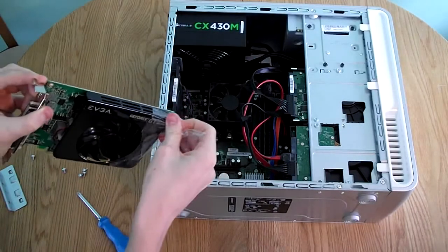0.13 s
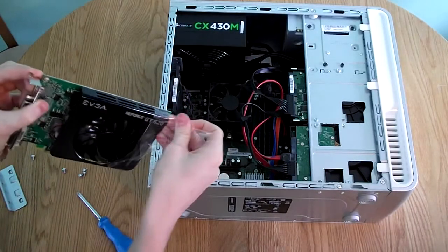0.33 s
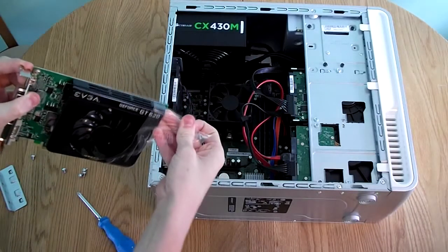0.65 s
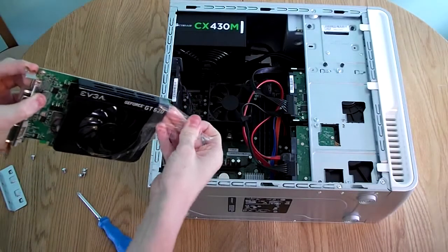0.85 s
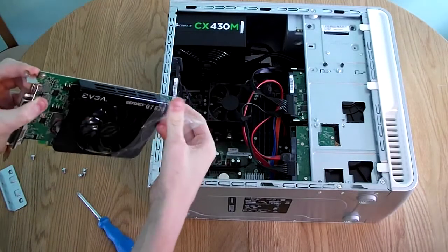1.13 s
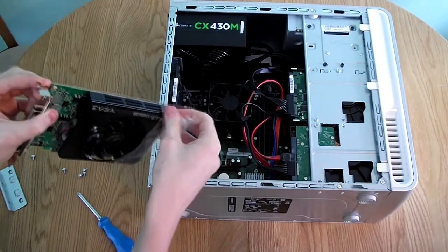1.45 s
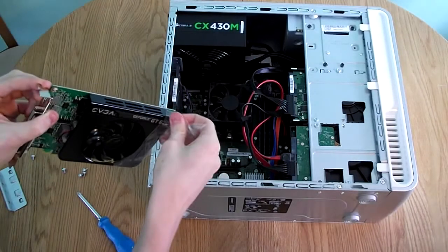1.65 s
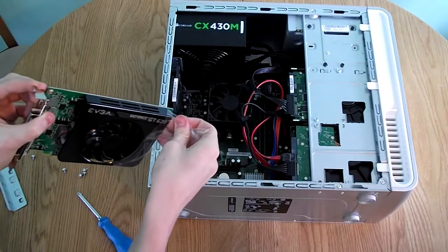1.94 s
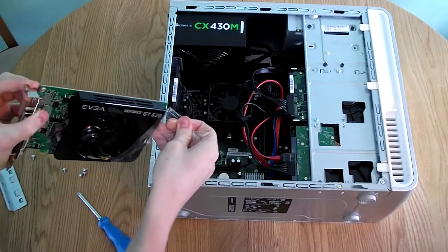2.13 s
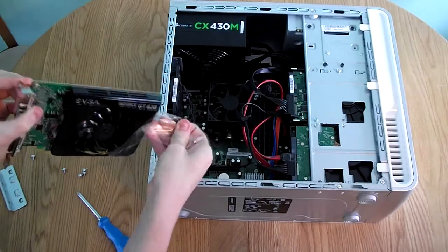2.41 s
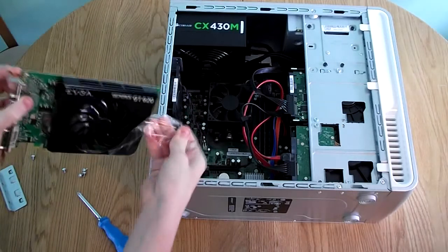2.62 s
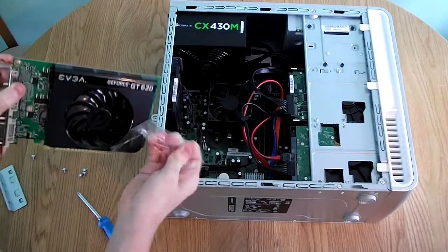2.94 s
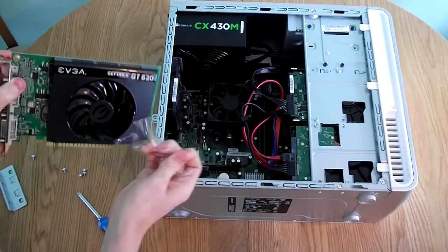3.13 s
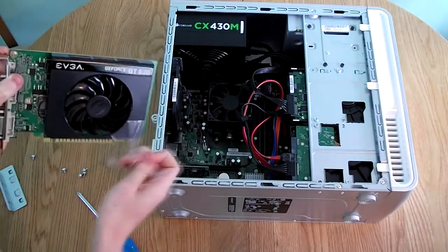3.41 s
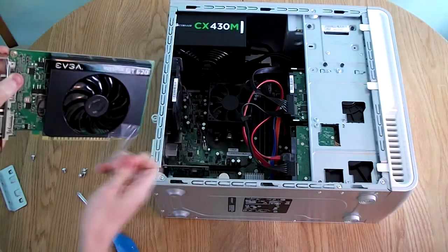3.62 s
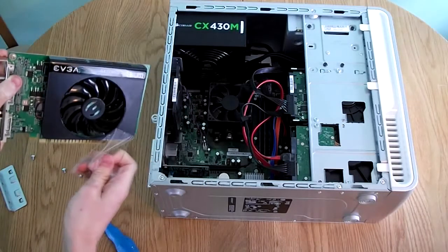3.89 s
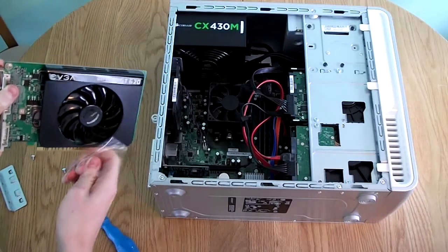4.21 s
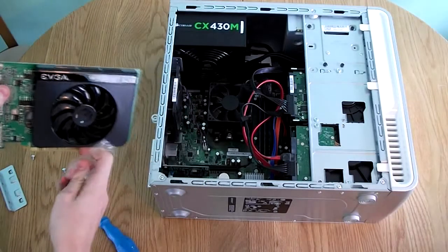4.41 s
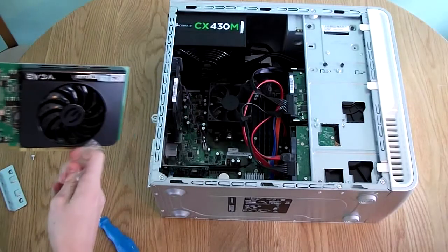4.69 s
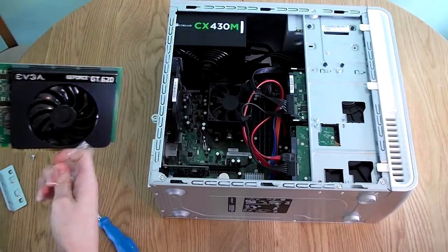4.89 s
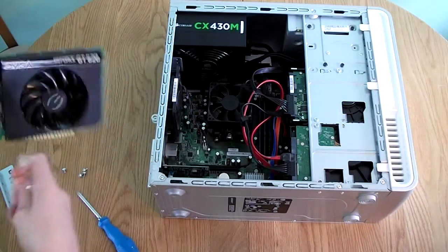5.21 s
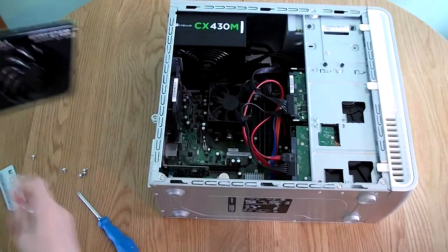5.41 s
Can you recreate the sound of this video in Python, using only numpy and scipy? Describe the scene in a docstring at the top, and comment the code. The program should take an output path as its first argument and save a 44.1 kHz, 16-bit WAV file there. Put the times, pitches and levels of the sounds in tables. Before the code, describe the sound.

Irregular, bright plastic crackling indoors, heard very close with a short room echo. An early flurry of sharp snaps is followed by sparse ticks, then a tight, louder cluster that makes the microphone level dip and recover. Bursts of crinkle and short rips follow, then gentler isolated crackles, a faint metal ring and a last crisp crease, over soft room tone and a low wavering hum.

```python
"""Protective film is peeled by hand off a graphics card above a table in a small room.
A first hard pull fires a burst of snaps and rips (resonated kicks, tick trains); the card's metal modes ping.
The loudest snaps come near 1.6 s, dense crinkling (banded ticks) follows to about 3 s, then sparser creases.
A low drone of drifting pitch and wavering loudness (a sine), still air (noise) and faint hum run throughout.
A close camera turns its gain down after the loudest snaps and lets it creep back."""
import sys
import numpy as np
from scipy import signal
from scipy.fft import rfft, irfft
from scipy.io import wavfile
from scipy.ndimage import uniform_filter1d, minimum_filter1d

SR = 44100
rng = np.random.default_rng(int(sys.argv[2]) if len(sys.argv) > 2 else 0)


def generate_wav(sig):
    """Save sig (samples, or channels by samples) to the path in sys.argv[1] as 16-bit PCM at SR."""
    pcm = np.round(np.clip(np.atleast_2d(sig).T, -1, 1) * 32767).astype(np.int16)
    wavfile.write(sys.argv[1], SR, pcm)


N = 244755
TIME = np.arange(N) / SR


def undb(db):
    """Amplitude factor of a level in dB."""
    return 10 ** (np.asarray(db) / 20)


def unit(x):
    """Scale to rms 1."""
    return x / np.sqrt(np.mean(x ** 2) + 1e-18)


def curves(table):
    """Columns of a table of (s, ..) rows, interpolated sample by sample."""
    s, *columns = np.transpose(table)
    return [np.interp(TIME, s, c) for c in columns]


def gain_at(hz, points):
    """Amplitude gain of a (Hz, dB) spectrum, interpolated over log frequency."""
    point_hz, db = np.transpose(points)
    return undb(np.interp(np.log(hz + 1e-9), np.log(point_hz), db))


def colour(x, points):
    """Filter a sound by a (Hz, dB) spectrum."""
    hz = np.fft.rfftfreq(x.shape[-1], 1 / SR)
    return irfft(rfft(x) * gain_at(hz, points), x.shape[-1])


def resonate(x, hz, width):
    """Damped resonance applied twice; width of each pass is a share of the pitch."""
    w = 2 * np.pi * min(hz / SR, .45)
    a = np.sin(w) * abs(width) / 2
    section = np.array([a, 0, -a, 1 + a, -2 * np.cos(w), 1 - a]) / (1 + a)
    return signal.sosfilt([section] * 2, x + 1e-18)


def add(track, start_s, x):
    """Mix x into the track from start_s."""
    i = int(np.clip(start_s * SR, 0, N - 1))
    track[i:i + len(x)] += x[:N - i]


def slips(per_s, scatter_db):
    """Random ticks of either sign and scattered size, per_s of them a second."""
    hit = rng.random(N) < per_s / SR
    size = np.minimum(rng.standard_normal(N), 1.6)  # caps the largest
    sign = rng.choice([-1, 1], N)
    return hit * undb(scatter_db * size) * sign


def snaps(creases, flutter_s=0.0019, flutter_db=-1, crack_db=-27, edge_db=-11,
          table_db=-12, beam_db_per_db=0.32, beam_from_db=-14):
    """A crease kicks a facet for a cycle or two, then bending waves flutter; returns (to camera, to room)."""
    direct, sent, t = np.zeros(N), np.zeros(N), TIME[:SR // 50]
    kick = 1. * (t == 0)
    for start_s, level_db, hz, width, sheet_db in creases:
        waves = rng.standard_normal(len(t)) * np.exp(-t / flutter_s) * (t > .0004)
        crack = undb(crack_db) * unit(resonate(kick, 1770, 1.5))
        facet = unit(resonate(kick, hz, width)) + crack
        # a neighbouring facet rings along at its own pitch
        edge_hz = hz * 2 ** rng.uniform(-0.563, 0.45)
        edge = unit(resonate(waves, edge_hz, 0.067))
        sheet = unit(resonate(waves, hz, width + 0.34))
        snap = facet + undb(edge_db + sheet_db / 2) * edge + undb(sheet_db + flutter_db) * sheet
        # the table top throws it back, later or sooner as the hand moves
        table_delay_s = rng.uniform(0.00083, 0.0018)
        snap = snap + undb(table_db) * np.roll(snap, int(table_delay_s * SR))
        # levels count over 1 ms, rms was set over 20 ms
        snap = undb(level_db) * snap / np.sqrt(20)
        add(direct, start_s, snap)
        # the loudest facets face the camera, so the room gets less of them
        beam_loss_db = beam_db_per_db * max(level_db - beam_from_db, 0)
        add(sent, start_s, snap * undb(-beam_loss_db))
    return direct, sent


def small_creases(swell, crinkle_db, bright, scatter_db=4.5, width=0.86, sheet_db=-9,
                  spread_octaves=0.26, octaves_per_bright=-0.01):
    """Random creases, more frequent in a swell and louder with the crinkling; rows as snaps() takes them."""
    swell_per_s, slack_per_s = 40, 9.2
    # in gentle crinkling: crease level over 1 ms, pitch, level of the crinkling
    gentle_crease_db, gentle_hz, gentle_crinkle_db = -32.5, 5610, -40.5
    growth_db_per_db = 0.6
    rows, count = [], 1000
    per_s = slack_per_s + swell * (swell_per_s - slack_per_s)
    for place, chance, loud, high, broad in rng.random((count, 5)):
        i = int(place * N)
        if chance < per_s[i] * N / SR / count:
            growth_db = growth_db_per_db * (crinkle_db[i] - gentle_crinkle_db)
            level_db = gentle_crease_db + growth_db + scatter_db * (2 * loud - 1)
            octaves = octaves_per_bright * bright[i] + spread_octaves * (2 * high - 1)
            rows.append((i / SR, level_db, gentle_hz * 2 ** octaves, width * (.5 + broad), sheet_db))
    return rows


def crinkle_swells(attack_s=.012, release_s=0.032, slack_bright_db_per_octave=7.5):
    """Crinkling swells over a slack rustle; returns swell (0-1), level dB, brightness dB per octave."""
    # swells of crinkling: pulls of the hand, and the echo tail after the loud snaps near 1.6 s
    # start_s, length_s, level_db, brightness_db_per_octave
    swells = [(0.005, 0.0096, -35.5, 2.5), (0.137, 0.054, -47, 2), (0.23, 0.16, -24.5, 3.5),
              (0.72, 0.025, -47.5, 1.5), (0.91, 0.095, -46, -3.5), (1.031, 0.061, -35, 1),
              (1.479, 0.013, -39, -5.5), (1.626, .03, -40.5, -6.5), (1.827, .11, -39.5, 3),
              (2.021, 0.16, -32, 2), (2.22, 0.075, -41, -4.5), (2.318, 0.077, -30.5, -5.5),
              (2.424, 0.13, -43.5, -2.5), (2.593, .15, -36, 4.5), (2.879, .03, -43.5, 11.5),
              (2.96, 0.16, -32.5, 1), (3.195, 0.037, -39, -4), (3.346, 0.198, -39, 2.5),
              (3.569, .22, -45.5, 5), (3.8, .25, -56, 13), (4.185, .04, -39.5, -2.5),
              (4.29, .17, -42, -1.5), (4.5, 0.15, -43.5, 0.5), (4.823, 0.1, -43.5, 2),
              (5.08, 0.19, -43.5, -1), (5.389, 0.064, -34, 1.5), (5.529, .02, -27.5, 5)]
    # rustle of the film held slack between swells: time_s, level_db
    slack = [(0, -55), (1.4, -56), (2.9, -50.5), (5.55, -52)]
    power = undb(curves(slack)[0]) ** 2
    swell, bright = np.zeros(N), power * slack_bright_db_per_octave
    for start_s, length_s, level_db, bright_db in swells:
        rise = np.minimum(TIME - start_s, 0) / attack_s
        fall = np.maximum(TIME - start_s - length_s, 0) / release_s
        envelope = np.exp(rise - fall)
        share = (undb(level_db) * envelope) ** 2
        swell = np.maximum(swell, envelope)
        power = power + share
        bright = bright + share * bright_db
    return swell, 10 * np.log10(power), bright / power  # power-weighted brightness


def crinkle(level_db, bright, per_s=750, scatter_db=1.0, patchy_db=2.5):
    """Countless small creases: ticks with a short flutter, through bands of randomly varied tick size."""
    # colour of the crinkling: frequency_hz, density_db_per_hz
    film = [(400, -53), (900, -15), (1800, -10.5), (3000, -2), (4200, -4), (6200, -2), (9000, -18),
            (12500, -11.5), (16000, -26)]
    ticks, out = slips(per_s, scatter_db), 0
    flutter = rng.standard_normal(256) * np.exp(-TIME[:256] / .0009)
    ticks = ticks + 0.33 * signal.fftconvolve(ticks * rng.standard_normal(N), flutter)[:N]
    for k, hz in enumerate(np.geomspace(600, 14000, 9)):
        patchy = undb(patchy_db * rng.standard_normal(N))
        band = unit(resonate(ticks * patchy, hz, 0.82))
        weight = gain_at(hz, film) * np.sqrt(hz / 12000)  # density to band level
        tilt = undb(bright * np.clip(np.log2(hz / 5000), -1, 2))
        out = out + (-1) ** k * band * weight * tilt
    return out * undb(level_db)


def rips(per_s=3500, scatter_db=4):
    """The peel front races along: tiny slips of the glue swell to a climax and die away."""
    # rips: climax_s, swell_s, fade_s, level_db, pitch_hz, width_per_pitch
    runs = [(.25, 0.023, 0.088, -36.5, 930, 2.5), (.285, 0.0029, 0.013, -15.5, 4860, 1.2),
            (1.075, 0.018, 0.013, -35, 5370, 0.88), (2.057, 0.0031, 0.017, -23.5, 5630, 1.45),
            (2.744, 0.018, 0.022, -30, 5200, 1.3), (2.857, 0.0016, 0.0018, -15.5, 5160, 1.13),
            (2.975, 0.012, 0.046, -32, 6640, 3.35), (3.062, 0.0048, 0.0059, -17, 4000, 0.31),
            (3.074, 0.013, 0.013, -19, 5650, 2.5), (3.085, 0.012, 0.016, -40, 990, 0.9),
            (3.67, 0.06, 0.021, -40, 12200, 2.5), (3.865, 0.0097, 0.0047, -34, 6270, 0.19),
            (5.148, 0.011, 0.0028, -19, 5160, 0.85), (5.158, 0.0026, 0.00294, -15, 5570, 1.2),
            (5.152, 0.012, 0.0092, -27, 12400, 0.66)]
    out, ticks = np.zeros(N), slips(per_s, scatter_db)
    for climax_s, swell_s, fade_s, level_db, hz, width in runs:
        near = abs(TIME - climax_s) < .1
        t = TIME[near] - climax_s
        envelope = np.exp(-abs(t / np.where(t < 0, swell_s, fade_s)))
        out[near] += undb(level_db) * unit(resonate(ticks[near], hz, width)) * envelope
    return out


def card(knock_s=0.0045, focus_db_per_octave=30, buzz=0.37, thud_db=-14, thud_s=0.00044):
    """The card jolts as the film gives: a hand-damped knock, and modes picked by the place of the jolt."""
    # jolts: start_s, knock_db, ring_db, best_mode_hz
    jolts = [(0.211, -20, -27, 2500), (1.586, -27, -60, 1500), (2.145, -21.5, -44, 1800),
             (2.306, -30, -36, 1140), (3.078, -32, -32.5, 2500), (4.065, -34, -40, 1632),
             (4.829, -68, -45.5, 2500), (4.937, -70, -47, 2550), (5.157, -47, -25.5, 2540),
             (5.254, -65, -46, 2470), (5.385, -61, -41, 2500)]
    # modes of card and bracket: pitch_hz, level_db, t60_s
    metal = [(900, -5, .2), (1150, -1, .2), (1550, -2, .22), (1660, -5, .13), (1810, -7, .2),
             (2400, -15, .1), (2503, 1, .16), (2545, -11, .08), (4247, -4, .25)]
    # colour of the knock: frequency_hz, density_db_per_hz
    board = [(40, 38), (150, -30), (400, -1), (700, -29.5), (1100, 26.5), (2000, 29), (4000, -50)]
    out, t = np.zeros(N), TIME[:SR // 2]
    for start_s, knock_db, ring_db, best_hz in jolts:
        knock = unit(colour(rng.standard_normal(len(t)), board)) * np.exp(-t / knock_s)
        # the shove of the released film adds one soft thud
        knock = knock + undb(thud_db) * t / thud_s * np.exp(1 - t / thud_s)
        ring = 0
        for hz, mode_db, t60_s in metal:
            # the loosely held bracket shivers as it rings
            shiver = 1 + buzz * unit(resonate(rng.standard_normal(len(t)), 61, 1))
            tone = shiver * np.sin(2 * np.pi * hz * t) * np.exp(-np.log(1000) * t / t60_s)
            off_db = focus_db_per_octave * abs(np.log2(hz / best_hz))
            ring = ring + undb(mode_db - off_db) * tone
        add(out, start_s, undb(knock_db) * knock + undb(ring_db) * ring)
    return out


def low_drone(waver=0.27):
    """A low sine of drifting pitch and level, its amplitude wavering at random."""
    # drone: time_s, pitch_hz, level_db
    drone = [(0, 62.1, -49.5), (2.9, 60.2, -68), (3.15, 51.05, -50), (3.35, 54.2, -62), (3.55, 56.3, -48),
             (3.95, 54.15, -45.5), (4.3, 57.3, -50), (4.7, 52.6, -49.5), (5.1, 55.9, -56),
             (5.55, 53, -49.5)]
    hz, level_db = curves(drone)
    wobble = unit(resonate(rng.standard_normal(N), 6.3, 2.5))
    tone = np.sin(2 * np.pi * np.cumsum(hz) / SR)
    return undb(level_db) * unit(tone * (1 + waver * wobble))


def room(x, early_db=-11, early_s=0.0099, late_db=-12, t60_s=0.45):
    """Table and open case scatter the sound at once; the walls follow with a short noise tail."""
    # colour of the echo: frequency_hz, gain_db
    walls = [(100, -9), (1000, 9), (4000, 1.5), (8000, -3), (16000, 5)]
    t = TIME[:SR * 3 // 4]
    early = rng.standard_normal(len(t)) ** 3 * np.exp(-t / early_s) * (t > .0015)  # cubed: sparse
    late = rng.standard_normal(len(t)) * np.exp(-np.log(1000) * t / t60_s) * np.minimum(t / 0.0021, 1)
    echo = (undb(early_db) * unit(early) + undb(late_db) * unit(late)) / np.sqrt(len(t))
    return signal.fftconvolve(x, colour(echo, walls))[:N]


def background(air_db=-48.5):
    """Still air as coloured noise, household hum as faint steady sines."""
    # colour of the air: frequency_hz, density_db_per_hz
    air = [(20, -13), (36, 3), (62, -1), (85, -7), (140, -10), (300, -14), (560, -16), (1000, -23),
           (2500, -17), (4500, -19.5), (6500, -22.5), (9000, -33), (15000, -32)]
    # hum: pitch_hz, level_db
    hum_tones = [(226, -67.5), (538.5, -63), (587, -72), (980, -75), (1739, -71.5), (3278, -64),
                 (4457, -63.5), (4748, -68), (5728, -68.5), (6072, -71)]
    hum = sum(undb(db) * unit(np.sin(2 * np.pi * (hz * TIME + rng.random()))) for hz, db in hum_tones)
    return undb(air_db) * unit(colour(rng.standard_normal(N), air)) + hum


def scene(side_db=-2.5, card_room_db=-7):
    """Two close ports: the right hears the sound a sample sooner, and the treble of the echo differs."""
    # big creases: start_s, level_db (over 1 ms), pitch_hz, width_per_pitch, sheet_flutter_db
    big_creases = [(0.0398, -19.5, 5600, 0.55, -5.5), (0.092, -23.5, 4700, 1.6, -1),
                   (0.212, -2, 4880, 0.64, 1.5), (0.2223, -12, 4200, 0.91, 5), (0.2399, -9, 4530, 0.3, -15),
                   (0.2487, -8.5, 4870, 0.39, -17), (0.2567, -9.5, 5130, 0.53, -19.5),
                   (0.2699, -13, 5350, 0.5, -15), (0.282, -5.5, 5750, 0.41, -20),
                   (0.3024, -11, 6000, 0.81, -2), (0.3212, -9, 5600, 0.51, -14),
                   (0.337, -8, 6100, 0.4, -21), (0.3483, -1.5, 4950, 1.5, -28),
                   (0.3725, -4, 4940, 0.91, -1.5), (0.379, -4, 6050, 0.33, -22),
                   (0.4074, -14.5, 6240, 0.35, -12), (0.4399, -18, 6540, 0.51, -7),
                   (0.4938, -9, 6640, 1.9, -10), (0.5838, -20, 6840, 0.47, -13.5),
                   (0.604, -20.5, 6500, 0.92, -18), (0.7208, -31, 3170, 2, -4),
                   (0.8404, -21.5, 5700, 2.5, -4), (1.0456, -26, 5100, 1.2, -1),
                   (1.0673, -21, 5530, 0.31, -22), (1.083, -22, 5280, 1.05, 2.5),
                   (1.1553, -31, 6140, 0.68, -14), (1.1728, -24, 6140, 0.51, 2),
                   (1.5015, -23, 6270, 0.28, -4), (1.5314, -28.5, 5400, 1, -4), (1.586, 0, 5800, 0.5, -18),
                   (1.5904, 1.5, 5700, 0.73, -15), (1.598, -3.5, 5660, 0.43, -15),
                   (1.6121, -2, 5450, 0.48, -19), (1.6172, -2, 5950, 0.35, -7.5),
                   (1.621, -11, 5670, 0.45, -14), (1.7898, -18, 6000, 0.68, -26),
                   (1.8293, -17.5, 6040, 0.62, -13), (1.87, -14.5, 4700, 2, -25),
                   (2.0115, -15, 4670, 1.07, -4), (2.0213, -15.5, 6600, 0.53, -17),
                   (2.0301, -12.5, 6170, 0.67, -21.5), (2.0559, -12.5, 5540, 1.55, -4),
                   (2.075, -14, 6240, 1.5, -12), (2.1072, -16, 5050, 2.4, -6),
                   (2.1456, -6, 4770, 1.28, -11), (2.181, -19, 4700, 2.2, -0.5),
                   (2.3065, -5, 6040, 1.35, -11), (2.3115, -11, 5440, 1.5, -21),
                   (2.316, -10.5, 3600, 1.6, -19), (2.3254, -13.5, 3820, 1.06, -2),
                   (2.337, -12.5, 4120, 0.85, -25), (2.3578, -14, 4230, 0.8, -15),
                   (2.7, -22, 7300, 0.33, -16), (2.819, -25.5, 4170, 0.87, -10),
                   (2.8443, -11, 5610, 1.13, -15), (2.858, -11.5, 3720, 0.49, -23),
                   (2.9591, -18.5, 5130, 0.95, 0), (2.9816, -18.5, 4340, 0.81, -13),
                   (3.021, -18.5, 4000, 0.88, -3), (3.072, -11, 4700, 0.45, 0),
                   (3.1977, -16.5, 5840, 1.8, -3), (3.368, -30, 5720, 0.57, 3.5),
                   (3.6274, -25, 7240, 3.9, 1), (3.8834, -25.5, 8980, 1.4, -11),
                   (3.9296, -27, 11300, 2.4, -3), (3.999, -28.5, 12000, 1.2, -13),
                   (4.067, -22, 4530, 1.6, 2), (4.1497, -20, 11700, 1.75, -10),
                   (4.1782, -28.5, 5155, 1.61, -4), (4.2022, -31.5, 6900, 2.3, -1),
                   (4.2268, -25, 5670, 1.2, -1), (4.3201, -32, 5240, 0.53, -17),
                   (4.4434, -23.5, 4100, 0.8, -26.5), (4.5364, -23, 5740, 0.64, 2),
                   (4.5946, -22.5, 5400, 1.06, -3), (4.7495, -11.5, 7740, 1.34, -0.5),
                   (4.8282, -28, 5630, 0.84, -5.5), (5.1214, -18.5, 5040, 0.72, -14),
                   (5.1465, -12.5, 5194, 0.78, -2.5), (5.1566, -14, 5500, 0.75, -26),
                   (5.3831, -29, 3880, 1.3, 1), (5.5431, -16.5, 7100, 0.59, -19)]
    # how far the channels part: frequency_hz, side_gain_db
    spread = [(1200, -7), (2000, -34), (3000, -3.5), (7000, -0.5), (15000, -1)]
    swell, crinkle_db, bright = crinkle_swells()
    rustle, jolts = crinkle(crinkle_db, bright) + rips(), card()
    steady = low_drone() + background()
    direct, sent = snaps(big_creases + small_creases(swell, crinkle_db, bright))
    into_room = sent + rustle + undb(card_room_db) * jolts
    sound = direct + rustle + jolts + room(into_room) + steady
    late = np.append(0, sound[:-1])
    treble = signal.butter(2, 4500, "high", fs=SR, output="sos")
    diffuse = signal.sosfilt(treble, room(into_room))  # a second, independent echo
    mid = (late + sound) / 2
    side = colour((late - sound) / 2 + undb(side_db) * diffuse, spread)
    return np.array([mid + side, mid - side])


def record(dry, limit_db=-8.5, recover_db_per_s=36, top_hz=16000):
    """Gain drops within 1 ms of a loud snap, holds, creeps back; overshoot clips, then a low-pass."""
    ms, hold = SR // 1000, SR // 8  # samples
    power = signal.lfilter(np.ones(ms) / ms, 1, np.mean(dry ** 2, axis=0))
    over_db = np.maximum(10 * np.log10(power + 1e-12) - limit_db, 0)
    held_db = -minimum_filter1d(-over_db, size=hold, origin=(hold - 1) // 2)  # maximum over the past
    creep_db = recover_db_per_s * TIME
    duck_db = np.maximum.accumulate(held_db + creep_db) - creep_db
    duck_db = uniform_filter1d(duck_db, size=ms)
    clipped = np.clip(dry * undb(-duck_db), -1, 1)
    return signal.sosfilt(signal.ellip(8, .2, 70, top_hz, fs=SR, output="sos"), clipped)


dry = scene()
out = record(dry)
generate_wav(out)
```